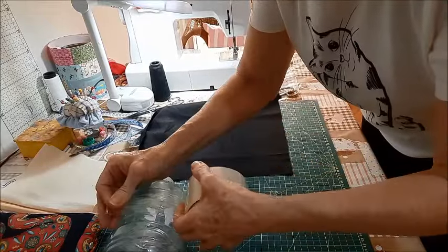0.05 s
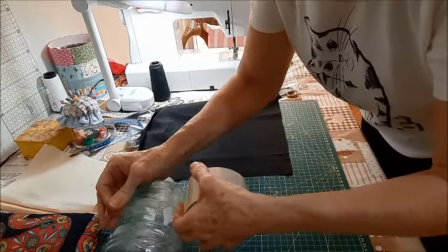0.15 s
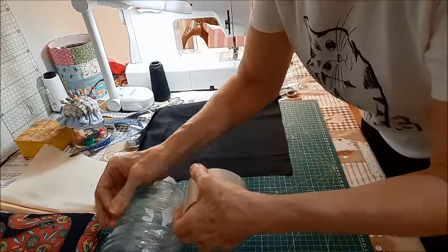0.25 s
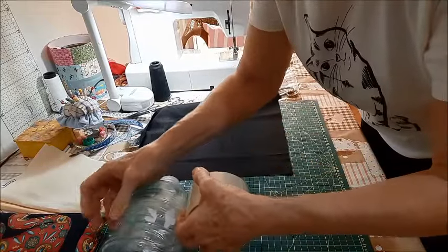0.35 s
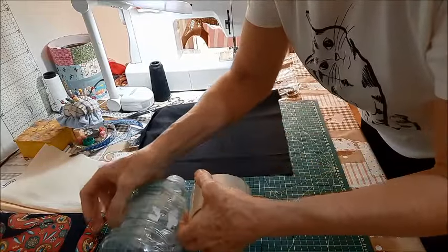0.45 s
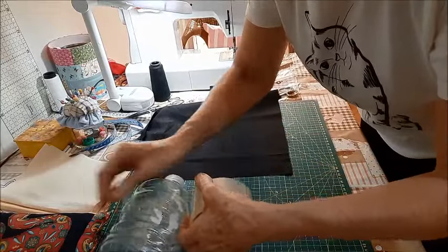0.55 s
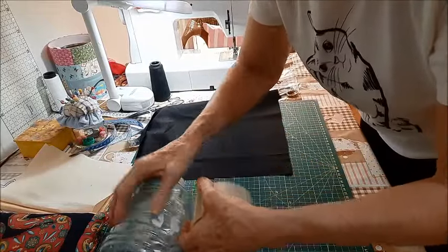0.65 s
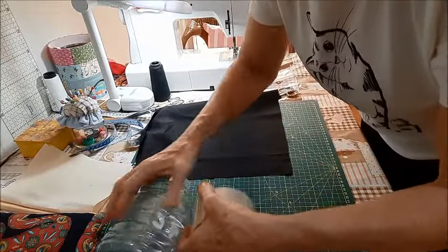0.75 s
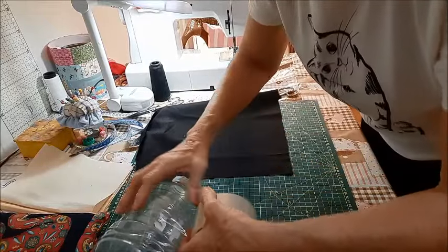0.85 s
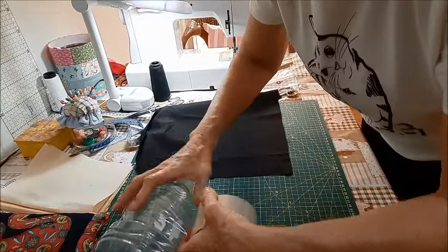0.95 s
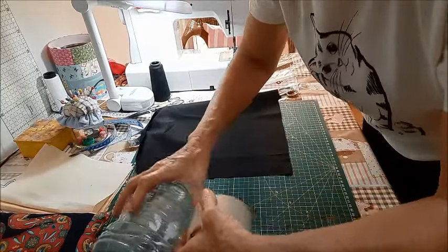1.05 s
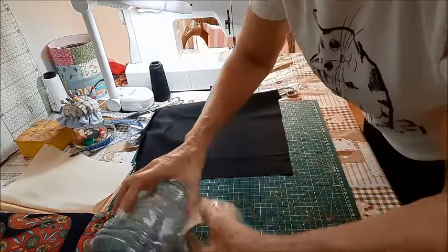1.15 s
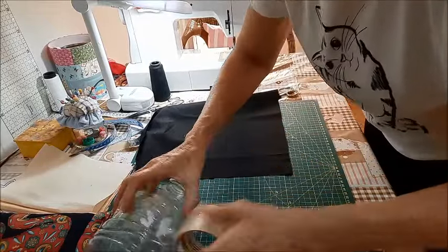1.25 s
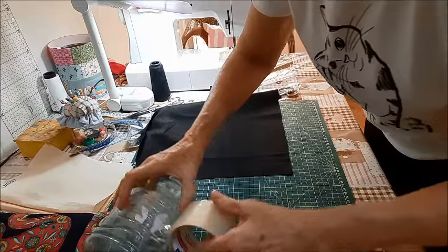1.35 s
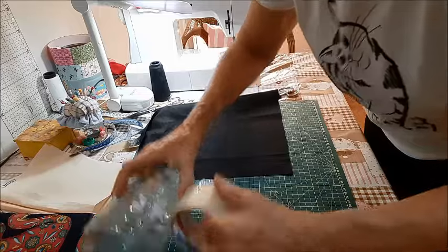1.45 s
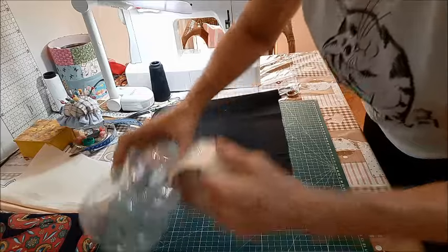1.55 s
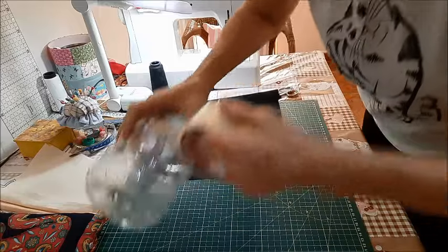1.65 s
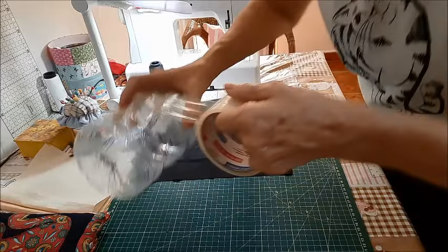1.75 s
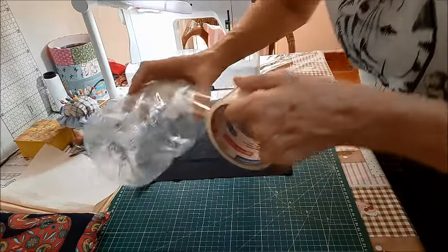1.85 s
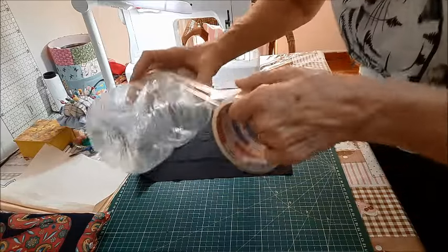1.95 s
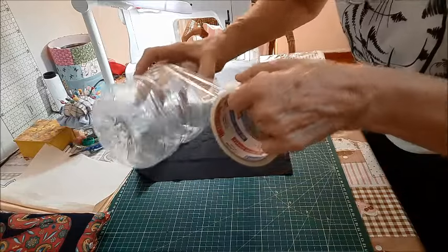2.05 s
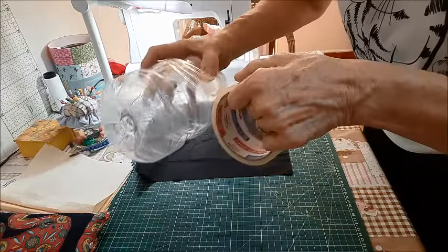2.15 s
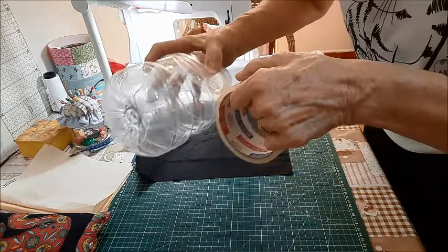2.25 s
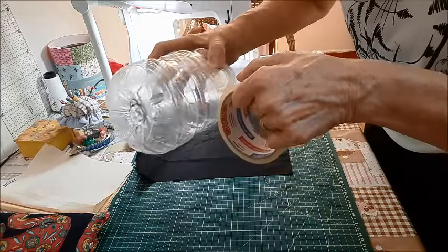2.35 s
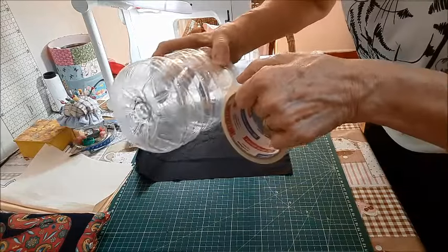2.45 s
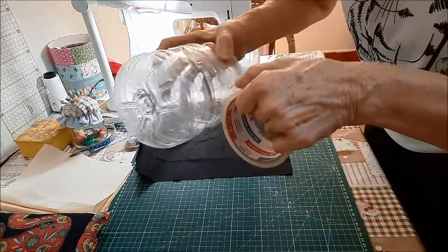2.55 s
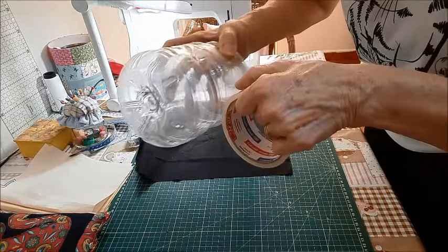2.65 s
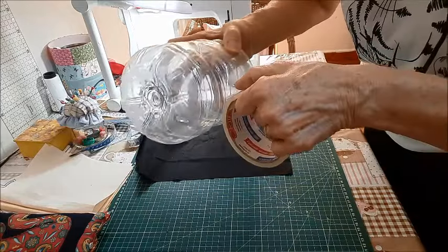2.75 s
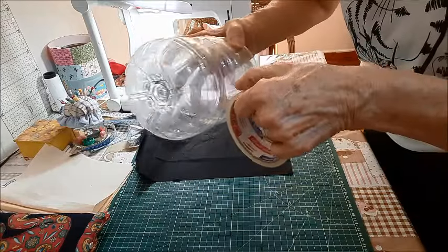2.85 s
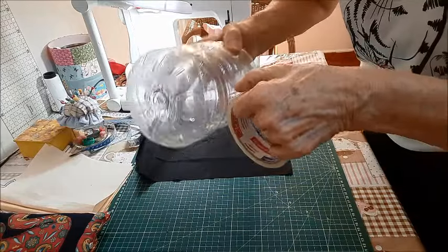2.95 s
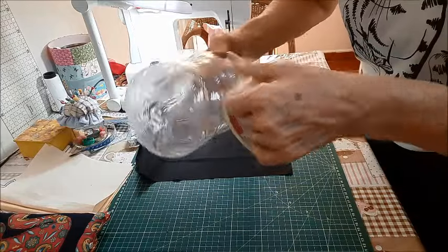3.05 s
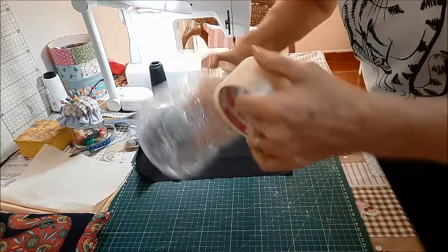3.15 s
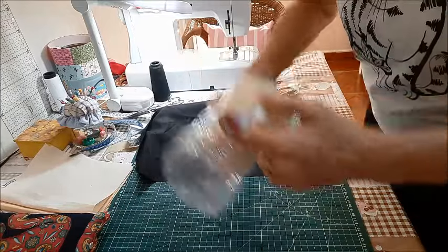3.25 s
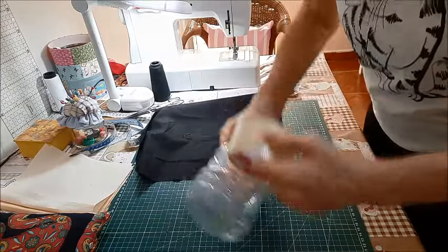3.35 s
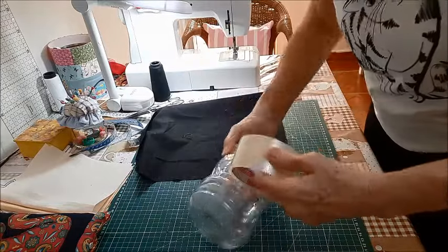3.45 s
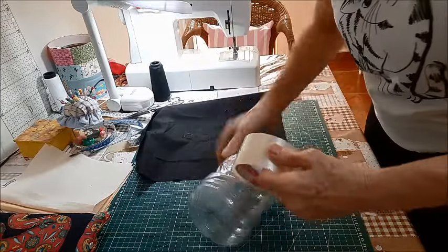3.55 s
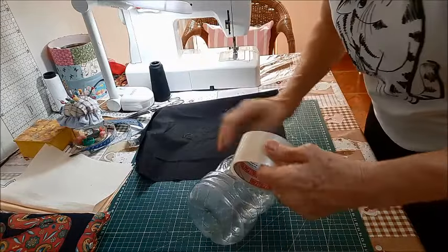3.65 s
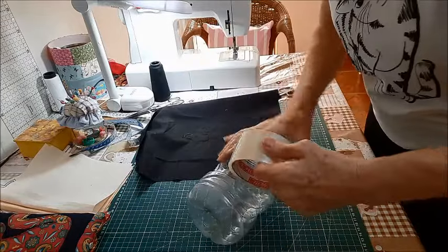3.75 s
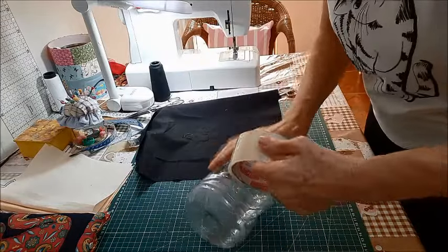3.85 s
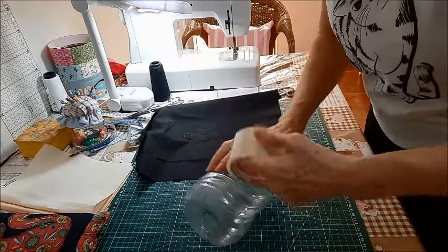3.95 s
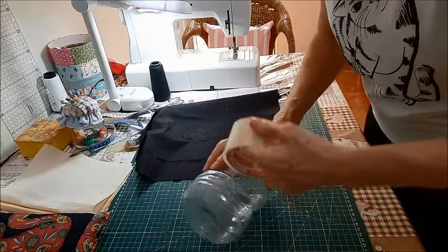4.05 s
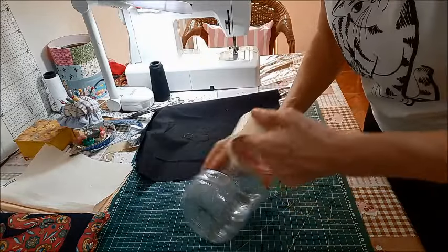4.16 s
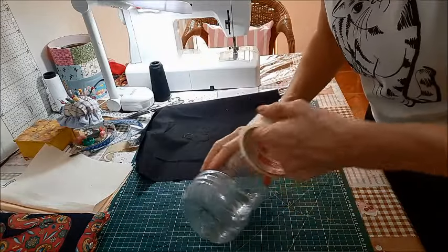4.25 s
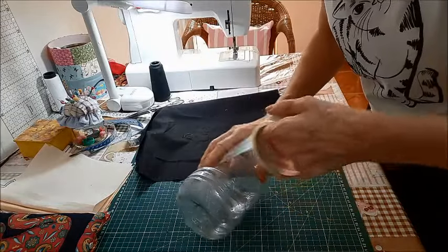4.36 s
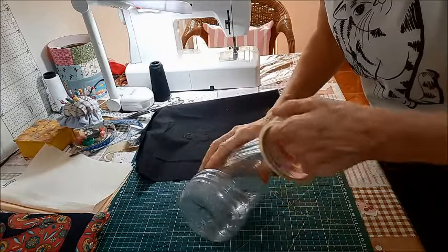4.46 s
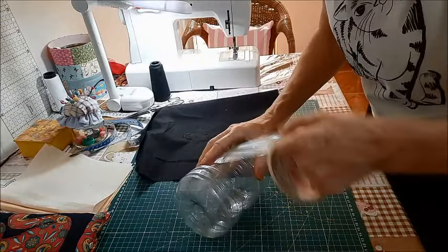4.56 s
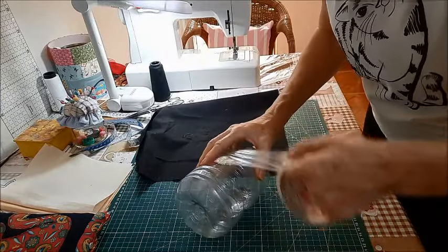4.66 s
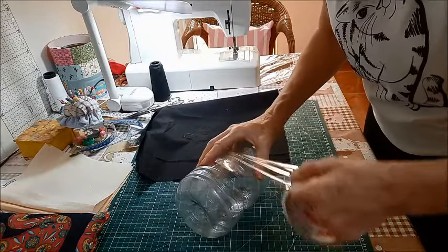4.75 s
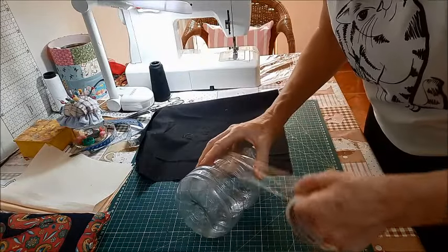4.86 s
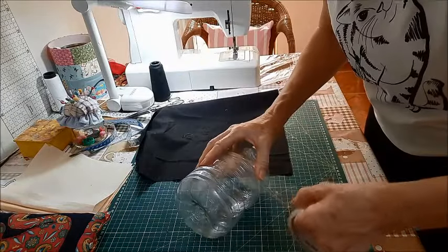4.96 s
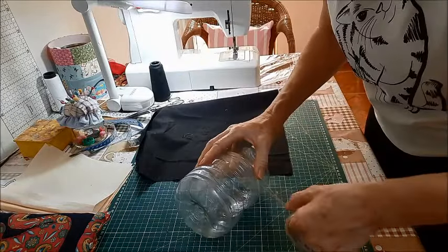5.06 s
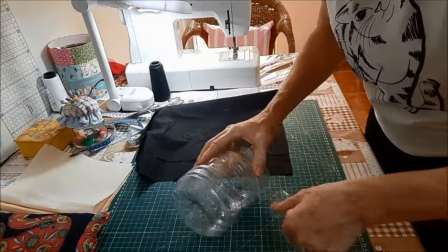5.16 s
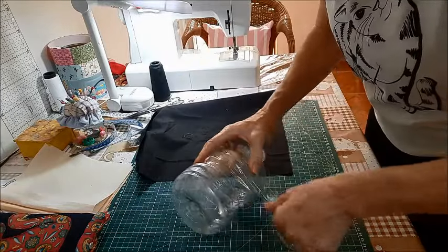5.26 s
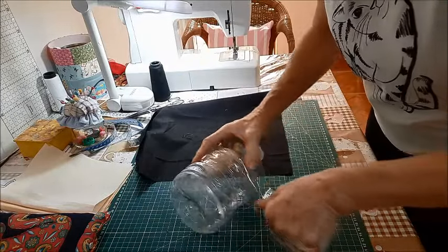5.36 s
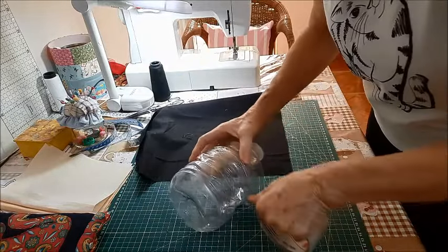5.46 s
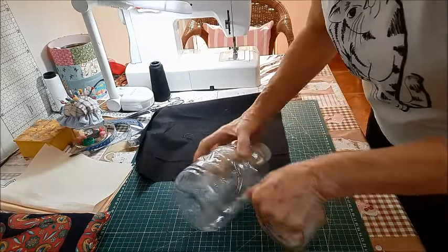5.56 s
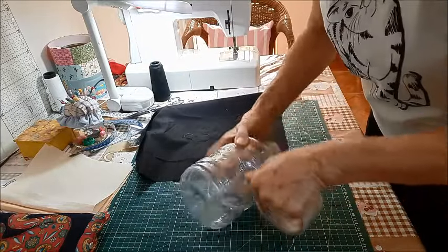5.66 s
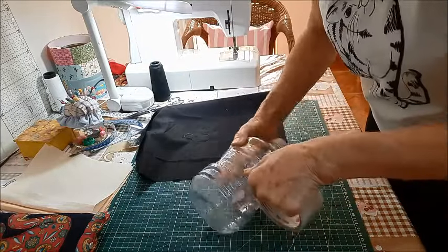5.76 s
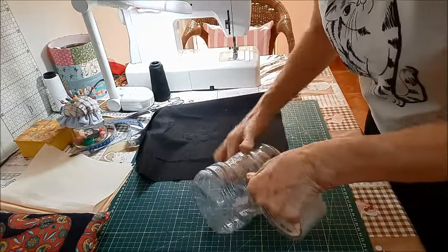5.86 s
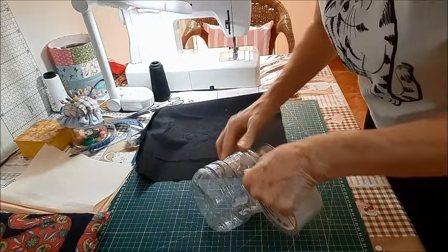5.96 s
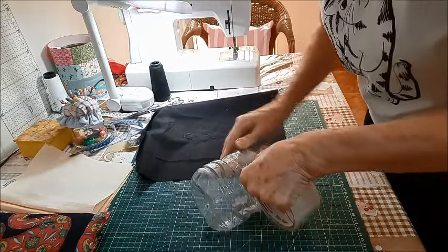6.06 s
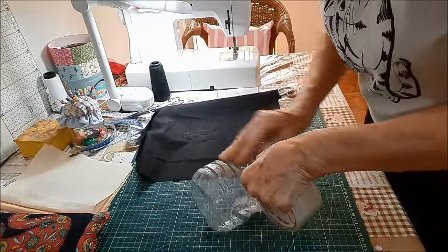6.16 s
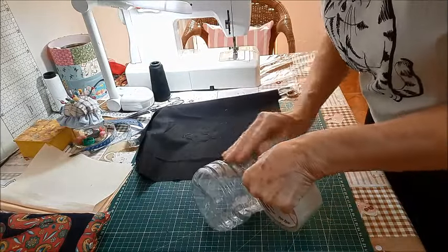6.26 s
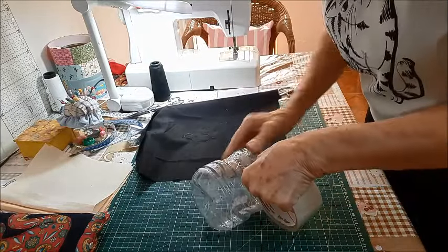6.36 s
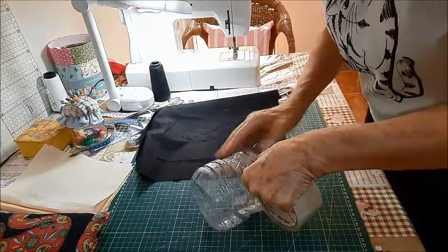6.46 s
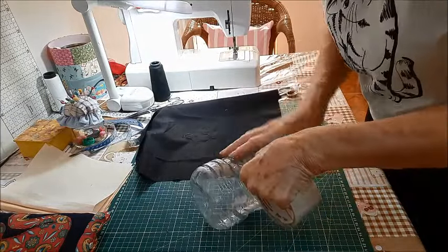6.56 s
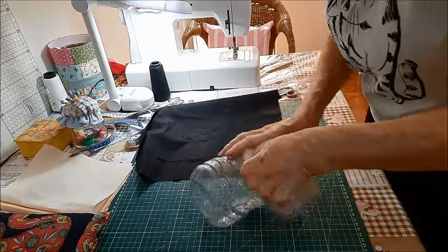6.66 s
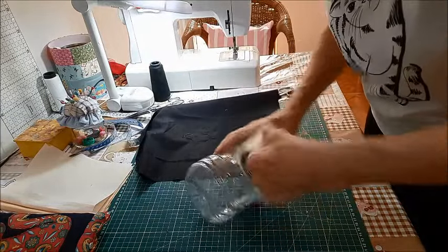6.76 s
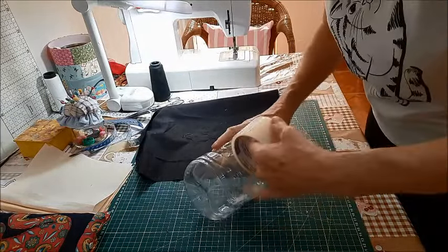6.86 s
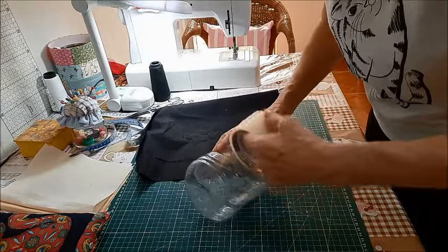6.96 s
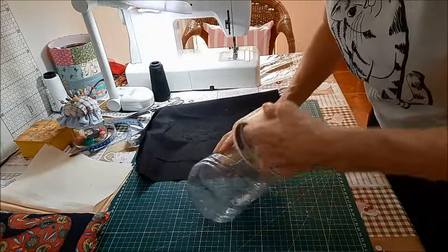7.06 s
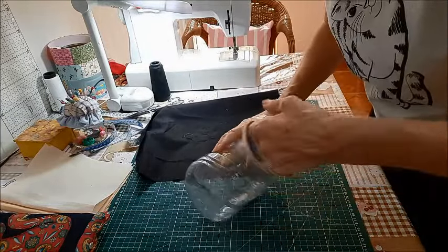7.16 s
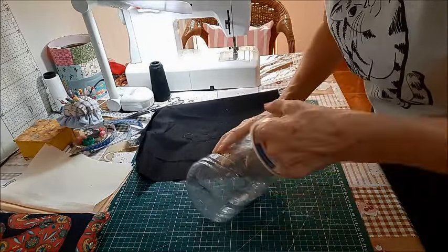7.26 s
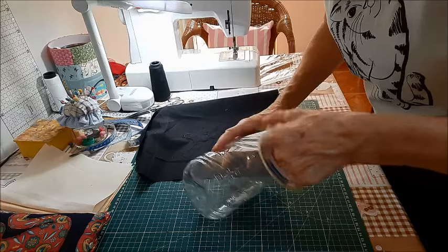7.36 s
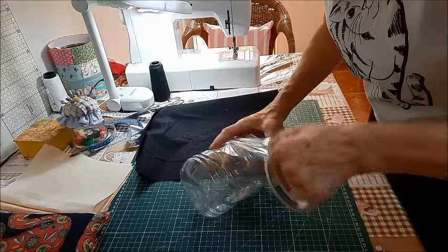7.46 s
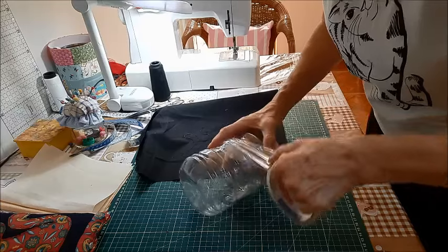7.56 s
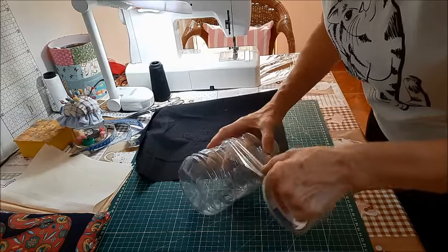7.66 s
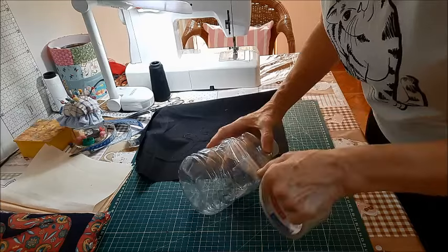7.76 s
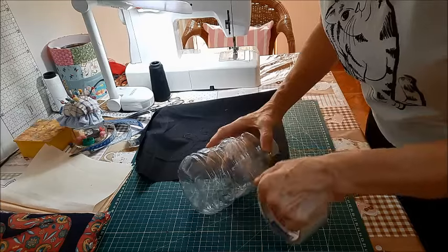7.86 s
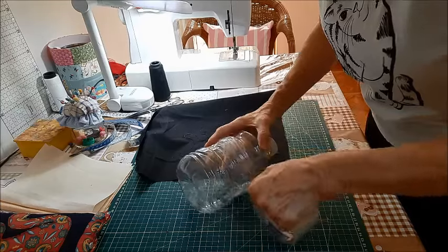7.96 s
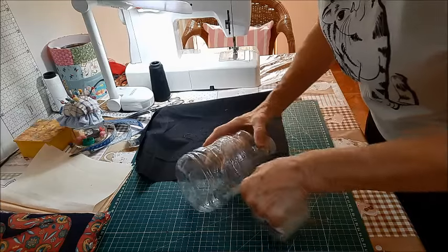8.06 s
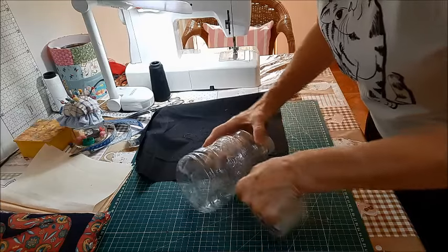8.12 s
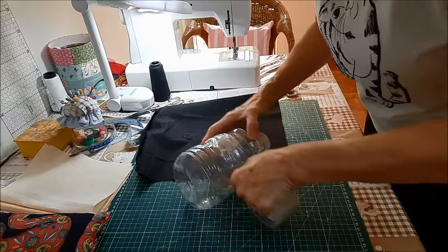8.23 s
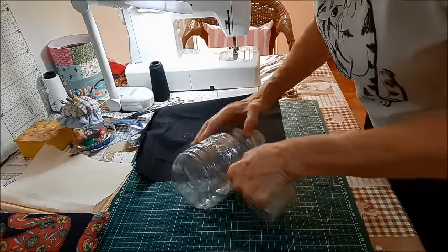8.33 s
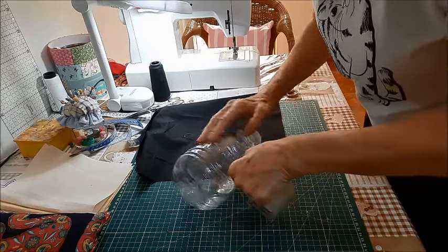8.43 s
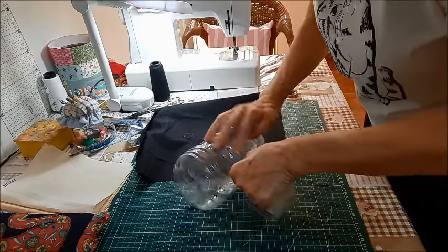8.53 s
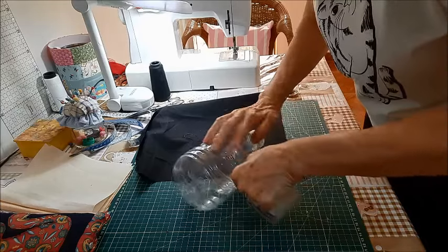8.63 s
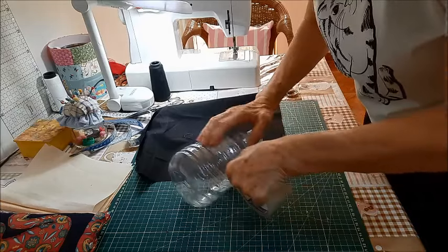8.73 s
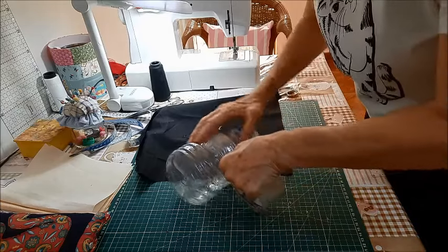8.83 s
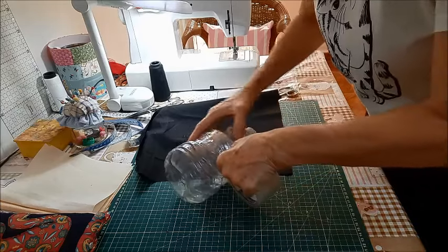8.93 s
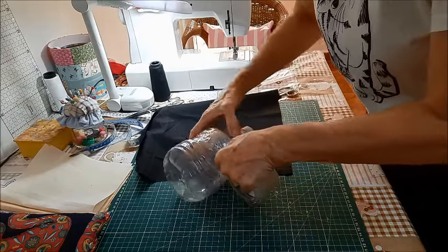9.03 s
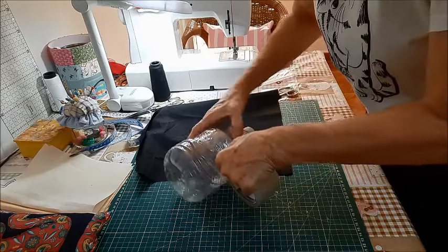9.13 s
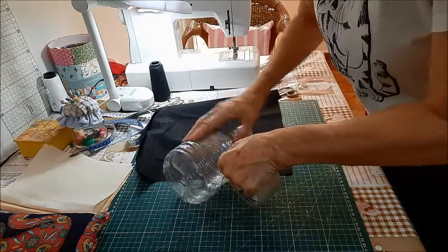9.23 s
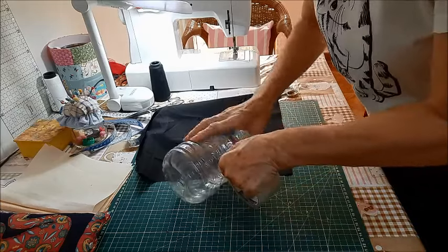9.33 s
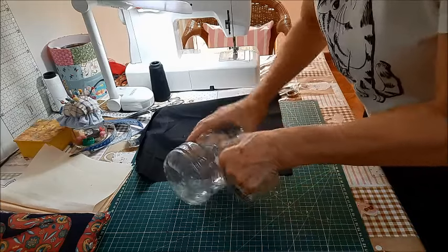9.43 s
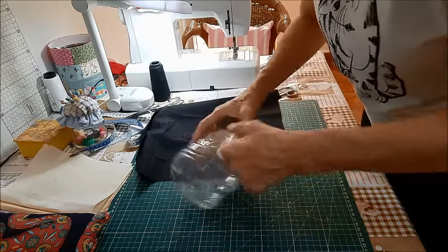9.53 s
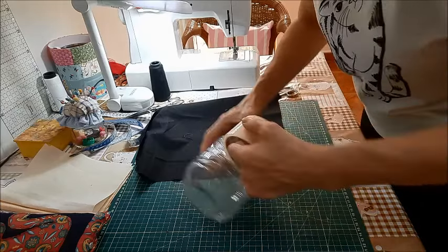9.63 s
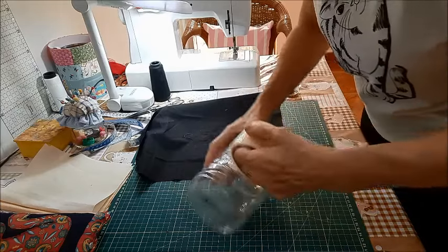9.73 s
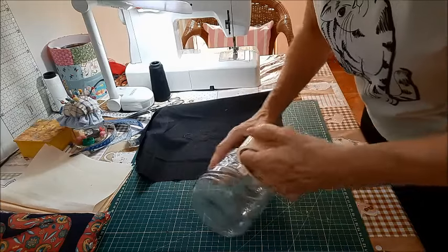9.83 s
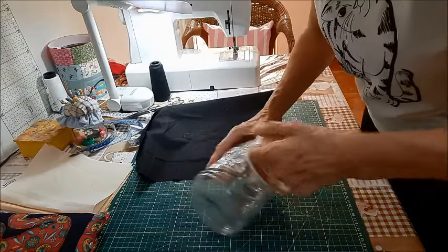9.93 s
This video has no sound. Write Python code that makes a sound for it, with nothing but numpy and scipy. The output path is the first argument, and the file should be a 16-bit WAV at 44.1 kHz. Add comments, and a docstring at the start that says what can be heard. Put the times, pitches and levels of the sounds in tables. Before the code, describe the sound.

Close by in a small hard room, fingers rub and crinkle film on an empty plastic bottle. Sharp snaps come first, then brief tape rasps near two seconds. After a quieter gap and soft bumps, tape peels loudly around four and seven seconds in rasping bursts and stutters. Later come rubbing and crackles, with a last snap and short rip at the end. Stereo, slightly left.

```python
"""Fingertips drag and rub on taped plastic while an empty bottle now and then bumps softly on its cutting mat.
Clear packing tape is being wound round it at a table in a small, hard room, a little left of two microphones.
The glue lets go in single snaps (noise bursts), even stutters (rows of snaps) or, as the tape is pulled, long
rasping runs and short faint crackles (impulse trains), which ring the strip and the hollow bottle (resonators).
All the while fingers rub, tick and crinkle the film (shaped noise) and bumps knock the table (dying sines)."""
import sys
import numpy as np
from scipy import signal
from scipy.fft import rfft, irfft
from scipy.io import wavfile

SR = 44100
rng = np.random.default_rng(int(sys.argv[2]) if len(sys.argv) > 2 else 0)


def dump_mix(stems):
    """Bounce the given channels to the path in sys.argv[1] as a 16-bit WAV at rate SR."""
    frames = np.atleast_2d(stems).T  # one column per channel
    limited = np.clip(frames, -1, 1)  # hard clip at full scale
    pcm = np.round(limited * 32767).astype(np.int16)
    wavfile.write(sys.argv[1], SR, pcm)


N = 440559

# spectrum of rubbed and crinkled film: (frequency [Hz], level [dB])
FILM_HISS = [(200, -27.5), (800, 0.5), (1200, 2), (1800, 2.5), (2800, 2), (4500, 7.5), (8000, 4),
             (9700, -4), (12000, 1), (15500, -1.5)]


def amp(db):
    """Decibels to gain."""
    return 10 ** (np.asarray(db) / 20)


def unit(x):
    """Scales to energy 1."""
    return x / np.sqrt(np.sum(x ** 2) + 1e-20)


def evened(x):
    """Scales to rms 1."""
    return x / np.sqrt(np.mean(x ** 2) + 1e-20)


def read(points, hz):
    """Reads a spectrum on a log-frequency axis."""
    f, value = np.transpose(points)
    return np.interp(np.log(hz + 1), np.log(f), value)


def curve(rows):
    """Reads a (time, value) table at every sample."""
    when, value = np.transpose(rows)
    return np.interp(np.arange(N) / SR, when, value)


def add(mix, s, sound):
    """Mixes a sound in at time s."""
    part = mix[max(round(s * SR), 0):][:len(sound)]
    part += sound[:len(part)]


def colour(x, spectrum, bright_db=0, size=4096):
    """Causal (minimum-phase) filter with the given spectrum; brightness is a shelf above 5.5 kHz."""
    hz = abs(np.fft.fftfreq(size, 1 / SR))
    shelf_db = bright_db * hz ** 4 / (hz ** 4 + 5500 ** 4)
    log_gain = np.log(amp(read(spectrum, hz) + shelf_db))
    taps = np.fft.ifft(np.exp(np.conj(signal.hilbert(log_gain)))).real
    return signal.oaconvolve(x, taps[:size // 2])[:len(x)]


def flat(x):
    """Keeps a burst's scatter in time but gives it equal strength at every pitch."""
    z = rfft(x)
    return unit(irfft(z / (abs(z) + 1e-12), len(x)))


def resonate(x, hz, width_hz):
    """A resonance of gain 1 that can follow a moving pitch."""
    turn = np.exp(2j * np.pi * np.cumsum(hz * np.ones(len(x))) / SR)
    r = np.exp(-np.pi * width_hz / SR)
    # turn the pitch down to zero, smooth there, and turn it back up
    smooth = signal.lfilter([1 - r], [1, -r], x / turn + 1e-18)
    return 2 * (turn * smooth).real


def ring(modes):
    """Half a second of dying sines after one blow."""
    t = np.arange(SR // 2) / SR
    return sum(amp(db) * np.exp(-np.log(1000) * t / t60) * np.sin(2 * np.pi * hz * t) for hz, db, t60 in modes)


def air():
    """Steady background noise of the place: a part of its own in each microphone and half of the other's."""
    # spectrum, strongest in the bass: (frequency [Hz], level [dB])
    air_spectrum = [(20, -30), (40, -16), (58, -0.5), (90, -10), (200, -24.5), (500, -27), (2000, -40),
                    (8000, -39.5), (16000, -40)]
    own = np.array([evened(colour(rng.standard_normal(N), air_spectrum)) for _ in range(2)])
    return own + .5 * own[::-1]


def pressure(waver_db=2.0, waver_hz=22):
    """The fingers never press quite evenly: a slow random gain round 1."""
    low_pass = signal.butter(2, waver_hz, fs=SR, output="sos")
    slow = signal.sosfilt(low_pass, rng.standard_normal(N))
    return amp(waver_db * evened(slow))


def stroke_level(start, length, db, attack_s=.025, release_db_per_s=171):
    """Gain of one stroke at every sample: it takes hold quickly, stays, and dies away."""
    t = np.arange(N) / SR - start
    release_db = release_db_per_s * np.clip(t - length, 0, 1)
    return np.clip(t / attack_s, 0, 1) * amp(db - release_db)


def touch(grip_db=-89):
    """How strongly fingers hiss on the film and scrape on the ribs; the strongest stroke counts."""
    # finger strokes over the taped bottle: (start [s], length [s], rubbing hiss [dB], hollow scrape [dB])
    stroke_rows = [(0, 0.013, -63, -57), (0.214, 0.048, -61, -61.5), (0.328, 0.14, -69, -68),
                   (0.478, 0.023, -48, -53.5), (0.65, 0.21, -56.5, -60), (0.924, 0.17, -57, -67),
                   (1.133, 0.1, -54, -49), (1.421, 0.019, -57, -62), (1.617, 0.21, -43, -46.5),
                   (2.102, 0.042, -75, -65), (2.76, 0.021, -71.5, -63), (2.873, 0.19, -74, -94.5),
                   (3.05, 0.088, -76.5, -87.5), (3.216, 0.027, -57.5, -52.5), (3.332, 0.21, -64.5, -65),
                   (3.486, 0.14, -57.5, -45), (3.74, 0.2, -78, -62.5), (3.881, 0.22, -51, -49),
                   (4.034, 0.73, -46, -46), (5.11, 0.079, -69, -85), (5.23, 0.059, -58, -55.5),
                   (5.462, 0.096, -59, -70.5), (5.6, 0.14, -62, -77), (5.718, 0.16, -60, -51.5),
                   (5.84, 0.038, -51, -44), (5.97, 0.027, -56.5, -66), (6.105, .05, -54.5, -66),
                   (6.15, 0.045, -40.5, -53), (6.26, 0.057, -59, -51), (6.334, .12, -45, -52.5),
                   (6.48, 0.31, -59.5, -51.5), (6.714, 0.12, -55.5, -52.5), (6.98, 0.26, -33, -41.5),
                   (7.3, 0.39, -52, -53), (7.954, 0.066, -64, -79), (8.126, 0.043, -60.5, -60.5),
                   (8.215, .04, -68, -78), (8.379, 0.094, -53, -68), (8.488, 0.058, -46, -67),
                   (8.674, 0.12, -56.5, -59.5), (8.859, .19, -47.5, -51.5), (9.111, 0.046, -47.5, -54.5),
                   (9.193, 0.086, -45, -51.5), (9.335, 0.33, -54.5, -51), (9.735, .22, -45.5, -44.5)]
    hiss = np.zeros(N)
    scrape = np.full(N, amp(grip_db))  # the hand that only holds the bottle
    for start, length, hiss_db, scrape_db in stroke_rows:
        level = stroke_level(start, length, hiss_db)
        hiss = np.maximum(hiss, level)
        scrape = np.maximum(scrape, level * amp(scrape_db - hiss_db))
    return np.array([hiss, scrape]) * pressure()


def grains(per_s, spread_db, smooth):
    """Tiny catches of random size over a smooth friction noise."""
    sizes = amp(spread_db * np.minimum(rng.exponential(1, N), 4))
    happens = rng.random(N) < per_s / SR
    catches = sizes * rng.choice([-1, 1], N) * happens
    return evened(catches) + smooth * rng.standard_normal(N)


def fingers(hiss_level, scrape_level, hiss_db=-2.0):
    """Skin slides over film and ribs: a crinkly hiss outside, a hollow scrape inside."""
    # spectrum of the hollow scrape: (frequency [Hz], level [dB])
    scrape_spectrum = [(120, -2.5), (220, -10.5), (340, -1), (460, 1.5), (620, -10), (820, -5),
                       (1100, -16.5), (1530, -11), (2500, -15), (6000, -48)]
    hiss = evened(colour(grains(per_s=300, spread_db=4, smooth=1.0), FILM_HISS))
    scrape = evened(colour(grains(per_s=80, spread_db=5, smooth=0.86), scrape_spectrum))
    return amp(hiss_db) * hiss_level * hiss + scrape_level * scrape


def crinkles(hiss_level, per_s=30, tick_db=-3, spread_db=6.0, follow=0.57, bright_db=2):
    """Even a light touch makes the film tick: sharp single buckles that grow more slowly than the rubbing."""
    uneven_db = spread_db * np.clip(rng.standard_normal(N), -2, 2)
    size = hiss_level ** follow * amp(tick_db + uneven_db)
    happens = rng.random(N) < per_s / SR
    return colour(size * happens, FILM_HISS, bright_db)


def drags(width_hz=900):
    """The skin catches and slips on the stretched film, and the catches excite its broad note."""
    # fingertip drags on tight film: (start [s], length [s], level [dB], note [Hz])
    drag_rows = [(0, 0.043, -73, 1950), (0.45, 0.06, -58, 1950), (0.758, 0.18, -62.5, 2080),
                 (3.53, 0.055, -52.5, 1900), (8.89, 0.14, -54, 1310), (9.208, 0.069, -54, 1400)]
    catches = grains(per_s=290, spread_db=9.5, smooth=.4)
    out = np.zeros(N)
    for start, length, db, hz in drag_rows:
        note = resonate(resonate(catches, hz, width_hz), hz, width_hz)
        out += stroke_level(start, length, db) * evened(note)
    return out


def bottle_ring(tape):
    """The bottle's lasting modes ring with the handling: freely while lifted, damped on the mat."""
    # modes of the bottle: (frequency [Hz], level [dB], t60 [s])
    bottle_modes = [(294, -1, .42), (364, -2.5, 0.22), (470.6, 3, 0.16), (799, -5, 0.51), (989, 0, 0.37),
                    (1245, -7.5, .25), (1530, -7, 0.44), (1960, -3.5, 0.32), (2040, -5.5, .25),
                    (2500, -2.5, 0.23)]
    # how freely it rings: (time [s], level [dB])
    lift_rows = [(1.5, -23), (1.9, -23), (2.4, -16.5), (3.4, -30)]
    drive = tape * amp(curve(lift_rows))
    return signal.oaconvolve(drive, unit(ring(bottle_modes)))[:N]


def room(x, wet_db=-1.5, near_db=-4, near_s=0.0013, gap_s=0.0037):
    """What one microphone hears besides the direct sound: scatter from hands and table, then the room's tail."""
    # how long the room rings: (frequency [Hz], t60 [s])
    tail_t60 = [(100, 0.15), (300, 0.3831), (1000, 0.324), (2500, 0.385), (5000, 0.2957), (9000, 0.33),
                (15000, 0.2167)]
    # how much of each pitch it returns: (frequency [Hz], level [dB])
    tail_spectrum = [(100, -2.5), (400, -3.5), (1000, -1.5), (2500, -4), (5000, -3.5), (9000, -5.5),
                     (15000, 2.5)]
    t = np.arange(SR * 3 // 4) / SR
    happens = rng.random(len(t)) < 5000 / SR  # about 5000 echoes per second
    echoes = rng.choice([-1., 1.], len(t)) * happens * (1 - np.exp(-(t / gap_s) ** 2))
    # each band of the tail decays at its own pace
    hz, when, z = signal.stft(echoes, SR, nperseg=256)
    z = z * np.exp(-np.log(1000) * when / read(tail_t60, hz)[:, None])
    tail = colour(unit(signal.istft(z, SR, nperseg=256)[1][:len(t)]), tail_spectrum)
    scatter = flat(rng.standard_normal(len(t)) * t * np.exp(-2 * t / near_s)) * np.exp(-t / gap_s)
    high_pass = signal.butter(1, 900, "high", fs=SR)  # small things reflect little bass
    scatter = unit(signal.lfilter(*high_pass, scatter))
    return signal.oaconvolve(x, amp(wet_db) * tail + amp(near_db) * scatter)[:N]


def moving(x, shifts_per_s=31, count=5):
    """The sounding spot shifts about the film: a few reflection patterns fade into one another in turn."""
    place = shifts_per_s * np.arange(N) / SR
    out = np.zeros(N)
    for k in range(count):
        away = abs((place - k) % count - count / 2)
        out += room(x * np.cos(np.pi / 2 * np.minimum(away, 1)))
    return out


def table(scrape_level, rumble_db=-15, follow=0.76, lag_s=0.03, bump_db=-1, contact_s=0.0051):
    """Soft bumps ring the table top; it rumbles under the hands, the more the harder they scrape."""
    # spectrum of the rumble: (frequency [Hz], level [dB])
    rumble_spectrum = [(20, -30), (45, -17), (62, -1), (90, -6.5), (122, 2), (170, -18.5), (260, -22.5),
                       (800, -61)]
    # modes of the table top: (frequency [Hz], level [dB], t60 [s])
    table_modes = [(72.3, -11.5, 0.19), (86, 1, 0.087), (122.4, -3, .3), (150, -11, 0.21)]
    # the bottle bumps down: (time [s], level [dB])
    bump_rows = [(.05, -40.5), (1.164, -36.5), (1.53, -43.5), (1.785, -30.5), (1.954, -42.5),
                 (2.549, -40.5), (3.461, -23), (3.609, -24.5), (3.662, -28.5), (3.94, -35), (4.412, -34),
                 (4.605, -38), (5.904, -38), (6.435, -34.5), (7.013, -36.5), (7.101, -33.5), (7.583, -35),
                 (9.484, -25), (9.817, -31.5)]
    keep = np.exp(-1 / (lag_s * SR))
    push = signal.lfilter([1 - keep], [1, -keep], scrape_level ** follow)
    out = amp(rumble_db) * push * evened(colour(rng.standard_normal(N), rumble_spectrum))
    thud = ring(table_modes)
    thud *= 1 - np.exp(-np.arange(len(thud)) / (contact_s * SR))  # the soft contact rounds the onset
    for s, db in bump_rows:
        add(out, s, amp(db + bump_db) * thud)
    return out


def hollow(x):
    """The short boxy answer of bottle and roll, each resonance passed twice."""
    # hollow resonances: (frequency [Hz], width of one pass [Hz], level [dB])
    hollow_modes = [(357, 150, 0.5), (460, 190, -0.5), (829, 35, -0.5), (1035, 190, -6)]
    return sum(amp(db) * resonate(resonate(x, hz, width), hz, width) for hz, width, db in hollow_modes)


def snaps(flutter_s=0.0035, crack_db=4, spike=0.5, damping_s=0.014, size=2048):
    """One slip or buckle: a spike, a few milliseconds of fluttering film, and the knock of the hollow body."""
    # loudest single snaps of glue and plastic: (time [s], level [dB], hollow [dB], brightness [dB])
    snap_rows = [(0.5091, -20, -30, -15), (0.7849, -21, -32, -2), (0.8241, -23.5, -24, 7.5),
                 (1.014, -27.5, -14, 6), (1.111, -22.5, -8, 5.5), (1.144, -15.5, -7.5, 3),
                 (1.1648, -6, -10.5, .5), (1.2158, -3, -10.5, 2.5), (1.2615, 2, -11, 1.5),
                 (1.4466, -19.5, -6, 5), (1.6883, -1, -5, 6.5), (2.551, -1.5, -10.5, -9.5),
                 (3.0551, -27.5, -17, 7), (3.4208, -18, -2, -6.5), (3.5118, -14, -6, -18.5),
                 (3.5493, -7, -3, -25.5), (3.607, -6, 0, -13), (3.6348, -9.5, -5, -2),
                 (4.054, -12.5, -12.5, 7.5), (4.0782, -10.5, -12, 1), (4.0929, 9, -26, -3),
                 (4.102, 4, -12, 4.5), (4.1303, .5, -4, 7), (4.1724, 1.5, -4, 0),
                 (5.362, -25.5, -25.5, 2.5), (5.6899, -17.5, -9, -1), (5.8621, -16, -5, 11),
                 (5.8928, -11.5, -2, 4), (6.434, -25.5, 0, 18), (6.6714, 5, -7.5, -6.5),
                 (6.916, -6, -4.5, 8), (6.9584, 2, -1.5, -1.5), (7.0083, 7.5, -10.5, -7),
                 (7.0219, 9.5, -4, -4.5), (7.1226, 8, -3, -5), (8.6482, -20.5, -18, 11.5),
                 (8.7059, -7.5, -12, -2), (8.9115, -20.5, -2, 3.5), (9.0024, -14, -43, -4.5),
                 (9.2421, -17.5, -9, 1), (9.3591, -14.5, -34, 5), (9.436, -4.5, -28, -4.5),
                 (9.4846, 7, -12.5, 0.5), (9.7893, -15, -16, 16.5), (9.808, 0, -8, -5), (9.849, -9, -38, 5),
                 (9.904, -13, -25, 8)]
    # spectrum of the crack: (frequency [Hz], level [dB])
    crack_spectrum = [(100, -13), (350, -7), (620, -8), (850, 2), (1150, -3), (1700, -1.5), (2600, -1),
                      (4500, 2), (7500, 0), (9700, -8.5), (12000, -5.5), (15500, -6.5)]
    out, t = np.zeros(N), np.arange(size) / SR
    impulse = 1. * (t == 0)
    body = unit(hollow(-impulse))
    for s, db, hollow_db, bright_db in snap_rows + stutters():
        decay_s = flutter_s * amp(db / 4)  # small snaps are briefer
        burst = rng.standard_normal(size) * np.exp(-t / decay_s) - impulse
        drive = flat(burst) * np.exp(-t / damping_s) - spike * impulse
        crack = amp(crack_db + bright_db / 2) * unit(colour(drive, crack_spectrum, bright_db))
        add(out, s, amp(db) * (crack + amp(hollow_db) * body))
    return out


def flexes():
    """The bottle's wall gives under the fingers: each dent rings one soft, hollow, damped note."""
    # dents of the wall: (time [s], note [Hz], starting level [dB], t60 [s])
    flex_rows = [(1.165, 394.4, -29.5, .14), (1.962, 272.5, -33.5, .36), (2.14, 320.2, -46, .2),
                 (3.61, 451, -31.5, .13), (5.737, 460, -41.5, .07), (5.803, 476, -41, .1),
                 (5.862, 446, -36, .15), (6.21, 366, -41.5, .1), (6.29, 419, -39, .07),
                 (6.36, 341, -45.5, .19), (6.672, 865, -26.5, .13), (8.146, 483, -47.5, .1),
                 (8.91, 890, -34.5, .05), (9.0, 835, -34, .05), (9.484, 910, -40, .11)]
    out = np.zeros(N)
    for s, hz, db, t60 in flex_rows:
        add(out, s, ring([(hz, db, t60)]))
    return out


def stutters(uneven_db=2.0):
    """Stutters, where the glue lets go in an even row of snaps of slightly unequal strength."""
    # (start [s], length [s], time between snaps [s], level of each [dB], hollow [dB], brightness [dB])
    stutter_rows = [(1.628, .013, .0065, -6.5, -13.5, 11.5), (4.703, .0636, .0127, 0, -6, -14),
                    (5.1806, 0.04, .0139, -5, -20.5, 0), (7.064, 0.016, .0082, 3, -3, -2),
                    (7.578, .0142, .0071, 0.5, -2, -4.5), (7.624, 0.04, .0087, -6, -13, 8)]
    row = []
    for start, length, gap, db, hollow_db, bright_db in stutter_rows:
        for s in np.linspace(start, start + length, round(length / gap) + 1):
            row.append((s, db + uneven_db * rng.standard_normal(), hollow_db, bright_db))
    return row


def pulls(median_slips_per_s=620, jitter=.45, uneven_db=0.5, fizz=0.2, fizz_s=0.0012,
          strip_width_hz=450, strip_rise_hz_per_s=1700, size=1500):
    """Stick and slip: each slip is a sharp drop of pressure with a fizz of breaking glue threads."""
    # pulls of the tape, long rasping runs and short faint crackles: (start [s], length [s], level [dB],
    # level change over the pull [dB], strip's starting note [Hz], strip [dB], hollow [dB], brightness [dB])
    pull_rows = [(1.628, 0.019, -32.5, 9.5, 3500, -8.5, -18.5, 6.5),
                 (1.754, .045, -12.5, 1, 1030, -10, -20, 0), (1.946, 0.022, -14, 0, 980, -5.5, -7.5, -4),
                 (4.087, .022, -17, -4, 1100, -28, -16, 5), (4.2103, 0.052, -12, 0.5, 1100, -10, -32, 0.5),
                 (4.372, .028, -12, 5, 2120, -15, -13, 2.5),
                 (4.407, 0.038, -17.5, -6, 2170, -13.5, -3.5, -4),
                 (4.558, 0.033, -16.5, -2.5, 1500, -4, -6, -1.5),
                 (4.587, 0.022, -18, -6.5, 2130, -10, -5.5, -2),
                 (4.704, 0.067, -23, -1.5, 1100, 0.5, -3.5, 5), (5.204, .022, -26.5, 3, 1516, 9, -3.5, 18),
                 (7.168, .040, -12.5, -1.5, 2280, -14, -14, 2.5), (7.21, .03, -14, 6, 860, -15, -5, -1.5),
                 (7.322, .051, -15.5, -1, 2080, -9.5, -4, -2.5),
                 (7.4504, .033, -15.5, 2, 1920, -0.5, -0.5, 5),
                 (8.7015, 0.0055, -31.5, 24, 1500, 10, -17, 10), (9.479, 0.0052, -19, 28, 885, 13, 5, 9),
                 (9.92, 0.062, -13.5, -1.5, 1050, -11.5, -11, 3)]
    # spectrum of the rasp: (frequency [Hz], level [dB])
    peel_spectrum = [(100, -37.5), (300, -17.5), (750, -6), (1300, -0.5), (2300, 0), (3100, -1.5),
                     (4500, -2), (7000, -4), (8500, -7), (9700, -15.5), (11500, -9), (15500, -12)]
    out = np.zeros(N)
    for s, length, db, change_db, hz, strip_db, hollow_db, bright_db in pull_rows:
        n = int(length * SR)
        gaps = np.exp(jitter * rng.standard_normal(200)) * SR / median_slips_per_s
        at = np.cumsum(gaps)
        at = (at - at[0]).astype(int)
        force = amp(uneven_db * rng.standard_normal(len(at)) + change_db * at / n)
        slips = np.zeros(n + size)
        slips[at[at < n]] = -force[at < n]
        fizz_level = signal.lfilter([1], [1, -np.exp(-1 / (fizz_s * SR))], slips)
        drive = slips + fizz * fizz_level * rng.standard_normal(n + size)
        # the stretched strip sings a broad note that climbs as it tightens
        rise_hz = strip_rise_hz_per_s * np.minimum(np.arange(n + size) / SR, length)
        strip = resonate(drive, hz + rise_hz, strip_width_hz)
        rasp = unit(colour(drive, peel_spectrum, bright_db))
        rasp = rasp + amp(strip_db) * unit(strip) + amp(hollow_db) * unit(hollow(drive))
        add(out, s, amp(db) * np.sqrt(n) * unit(rasp))
    return out


def scene(right_db=-4, right_room_db=-0.86, table_right_db=1.5, air_db=-77):
    """The work is a little to the left: it reaches the right microphone later and weaker."""
    hiss_level, scrape_level = touch()
    tape = fingers(hiss_level, scrape_level) + crinkles(hiss_level) + drags()
    tape = tape + snaps() + flexes() + pulls()
    tape = tape + bottle_ring(tape)
    late = np.concatenate([np.zeros(4), tape])[:N]  # 4 samples farther away
    direct = np.array([tape, amp(right_db) * late])
    reflected = np.array([moving(tape), amp(right_room_db) * moving(tape)])
    under = table(scrape_level) * amp([[0], [table_right_db]])
    return direct + reflected + under + amp(air_db) * air()


def record(dry, low_cut_hz=42, edge_hz=16000):
    """The microphones lose the deepest bass and round off the highest peaks; then the band limit."""
    low_cut = signal.butter(3, low_cut_hz, "high", fs=SR, output="sos")
    x = np.tanh(signal.sosfilt(low_cut, dry))
    band_limit = signal.firwin(601, edge_hz, window=("kaiser", 10), fs=SR)
    return signal.oaconvolve(x, band_limit[None], "same")


dry = scene()
out = record(dry)
dump_mix(out)
```